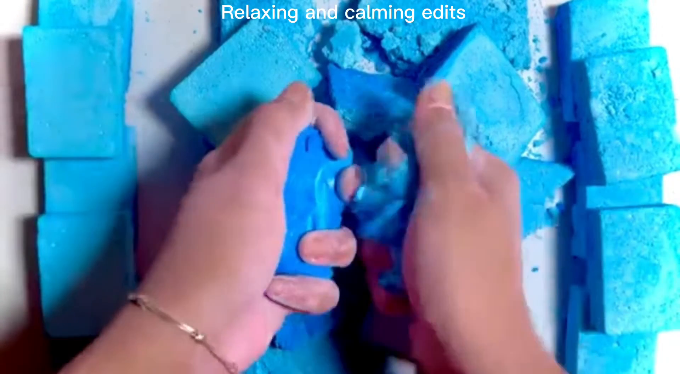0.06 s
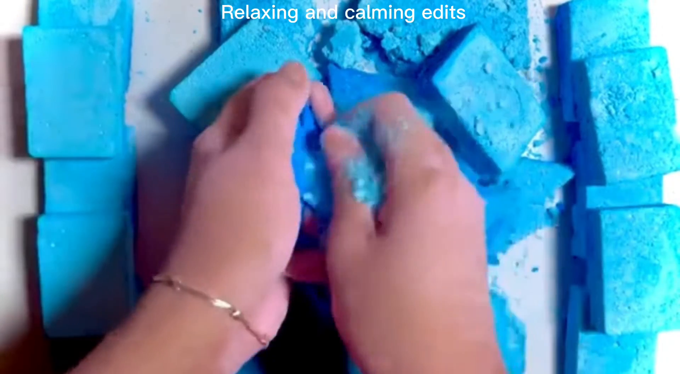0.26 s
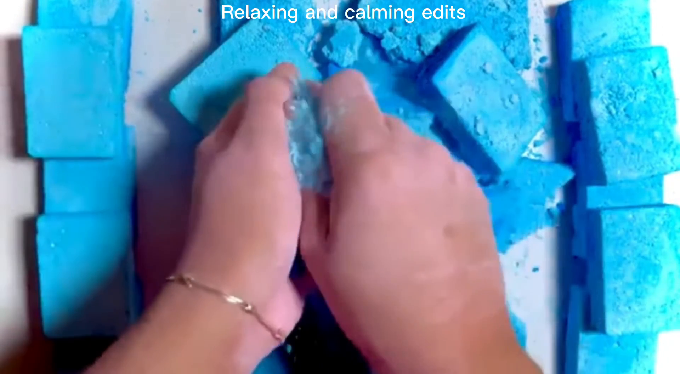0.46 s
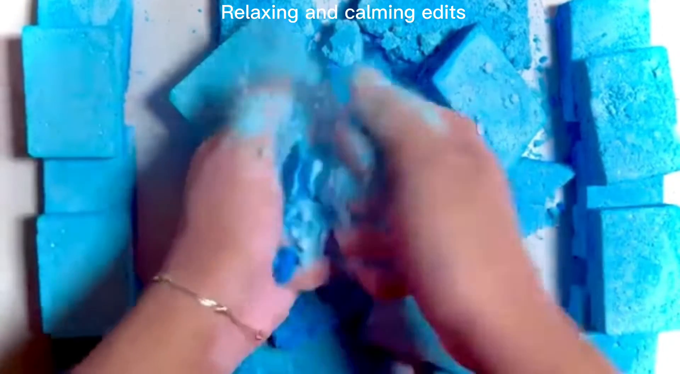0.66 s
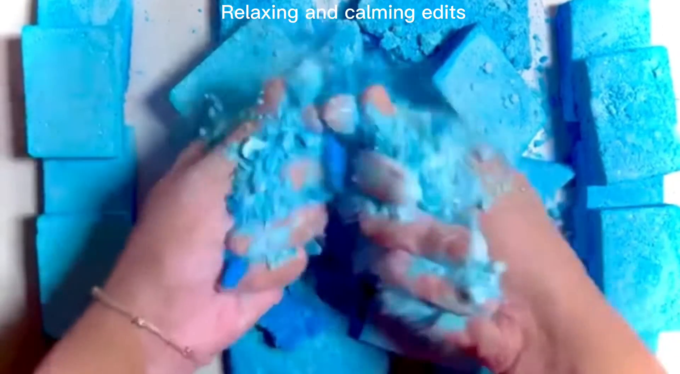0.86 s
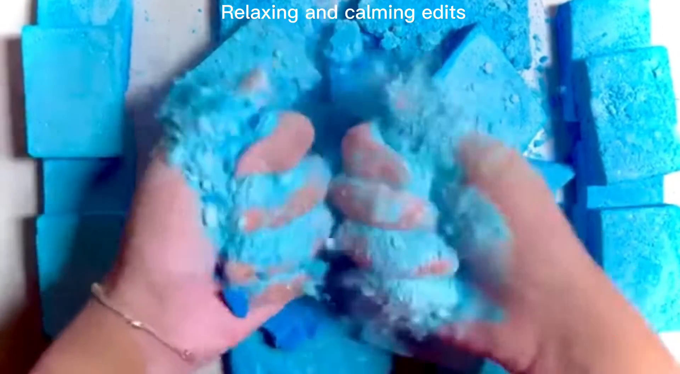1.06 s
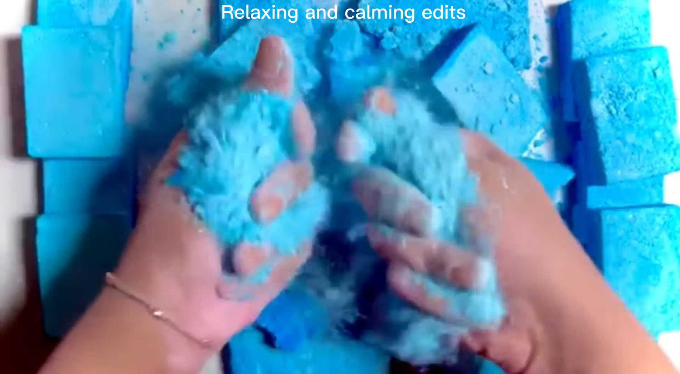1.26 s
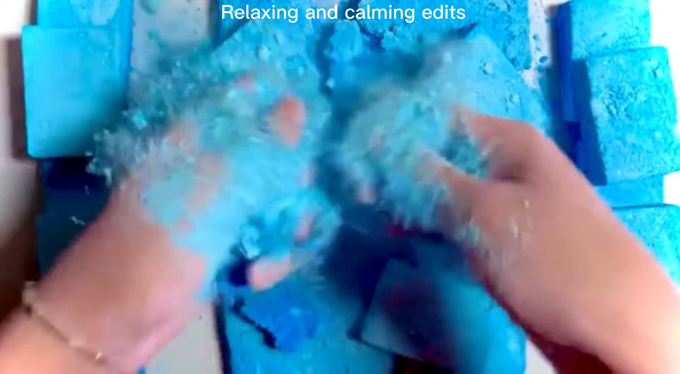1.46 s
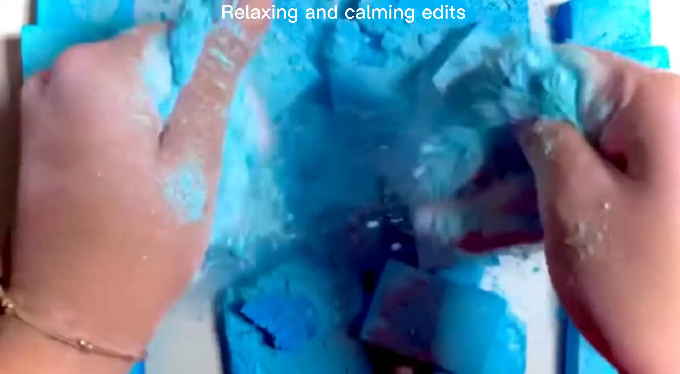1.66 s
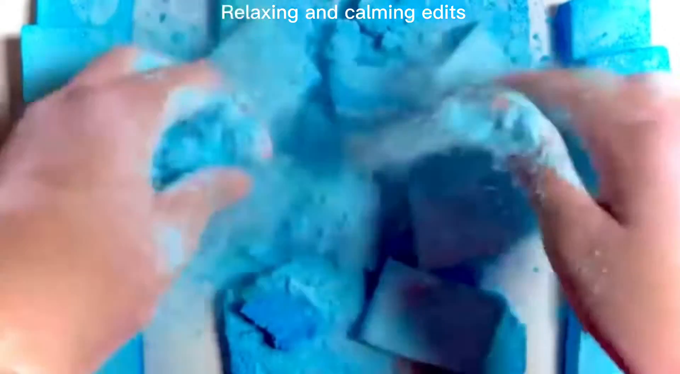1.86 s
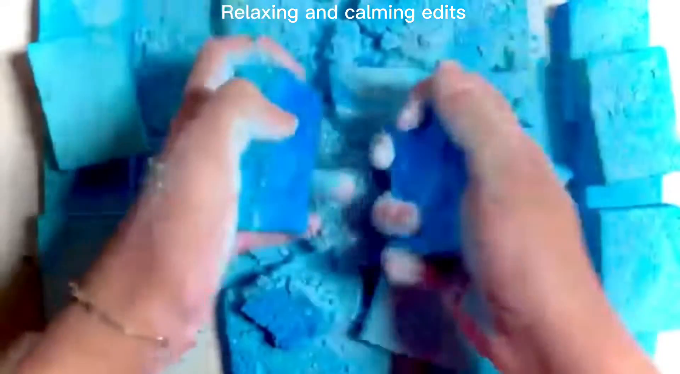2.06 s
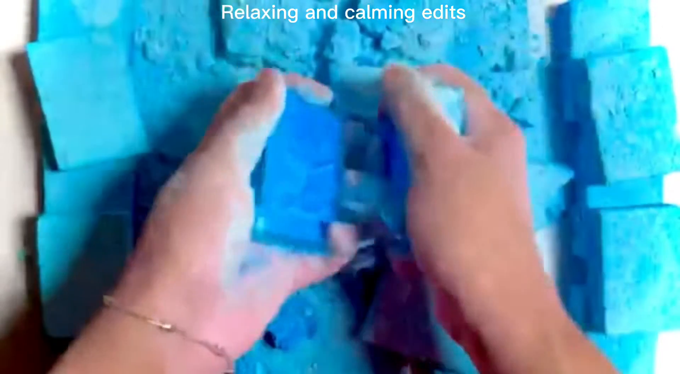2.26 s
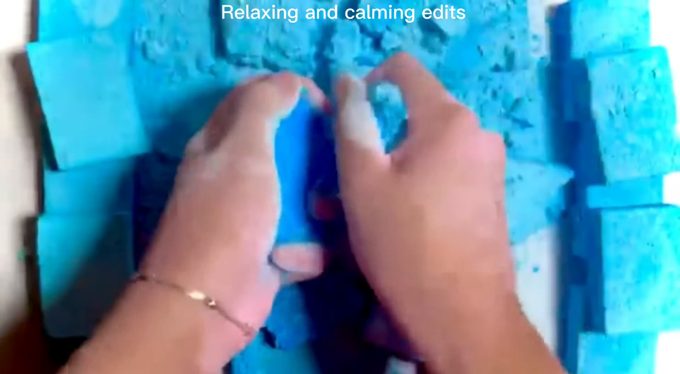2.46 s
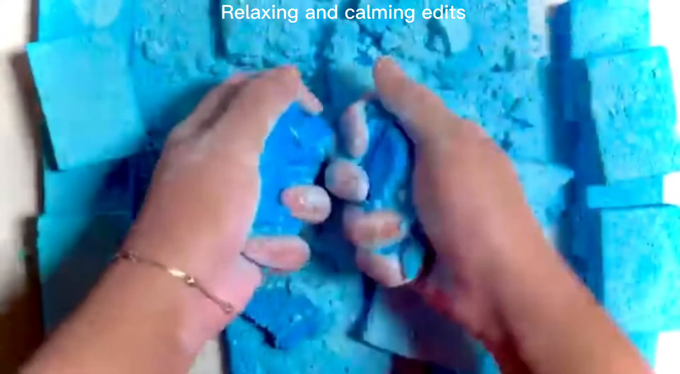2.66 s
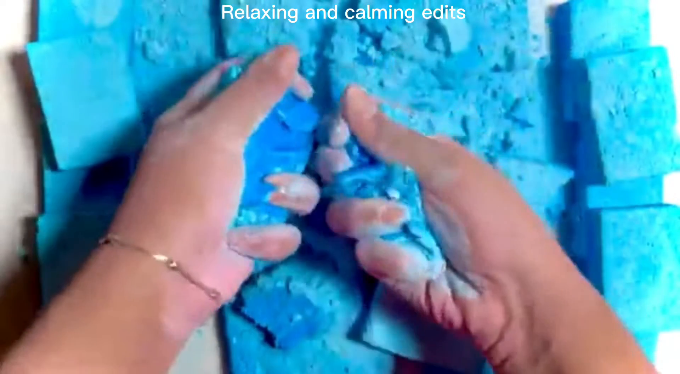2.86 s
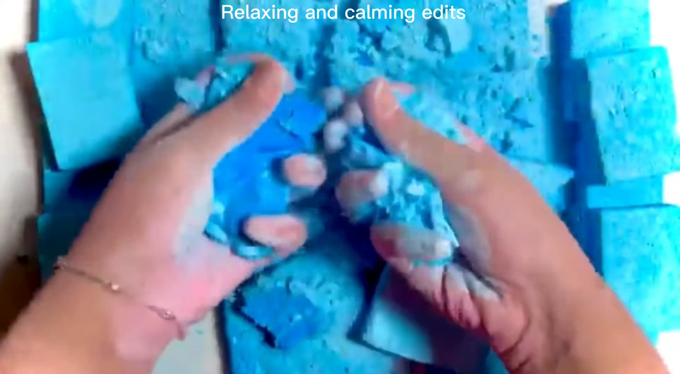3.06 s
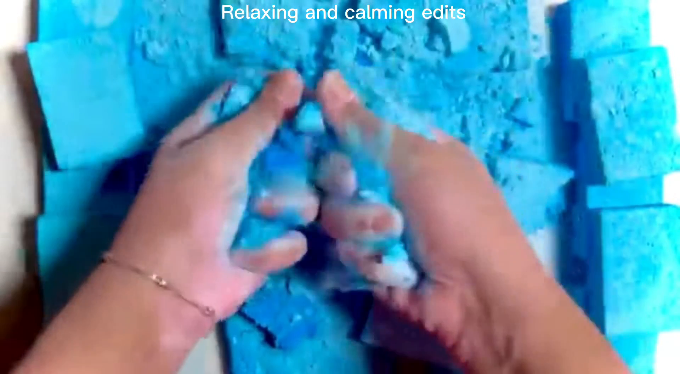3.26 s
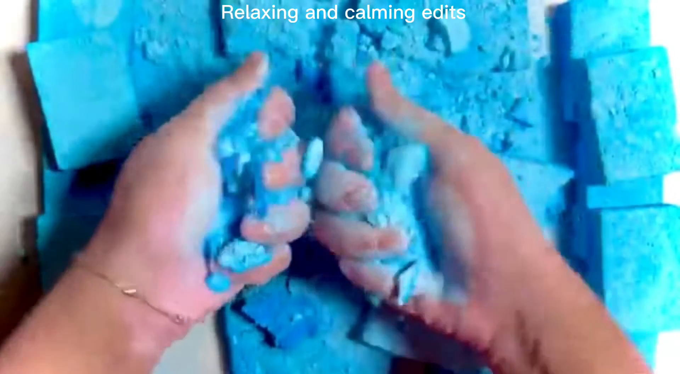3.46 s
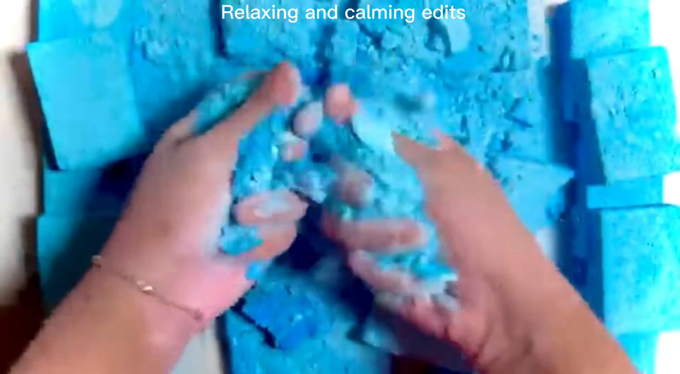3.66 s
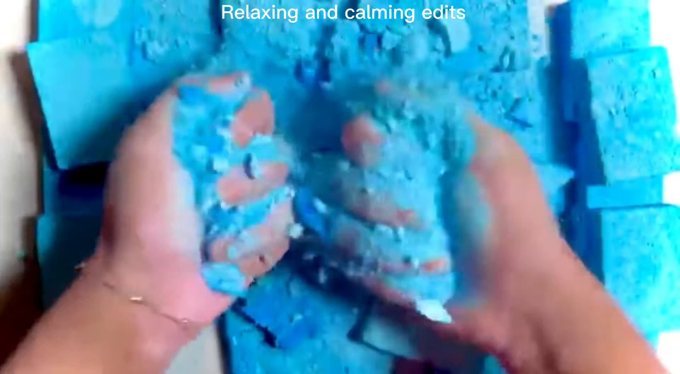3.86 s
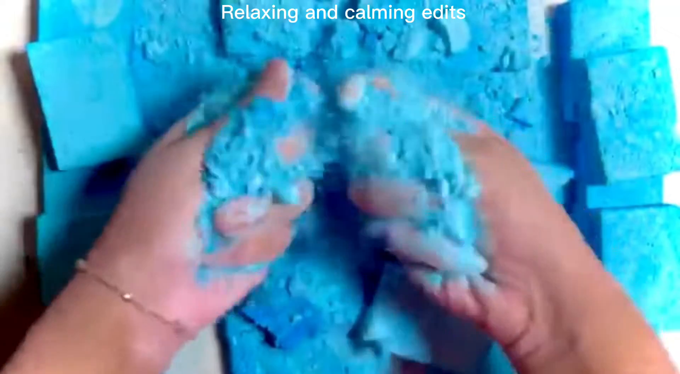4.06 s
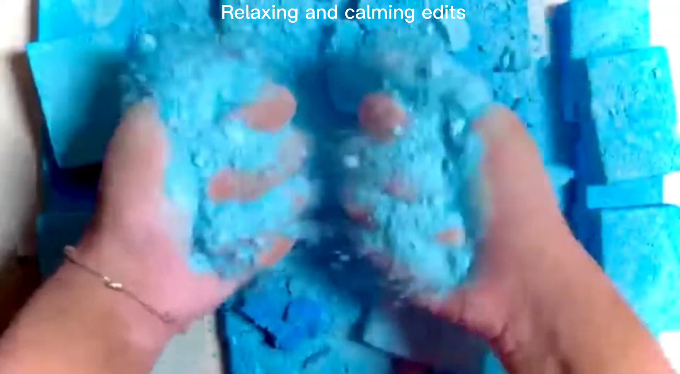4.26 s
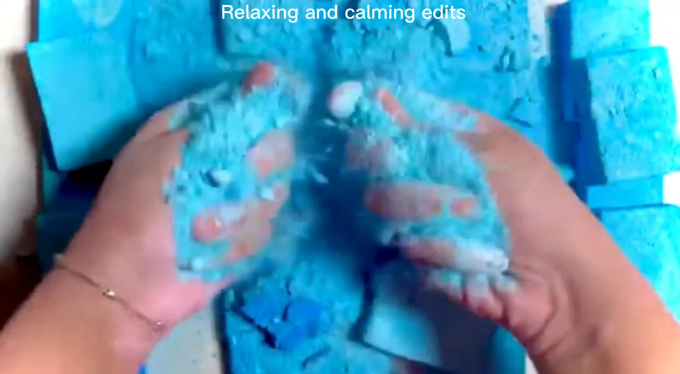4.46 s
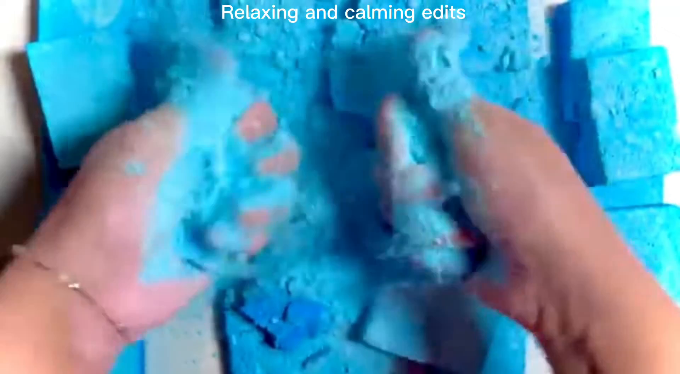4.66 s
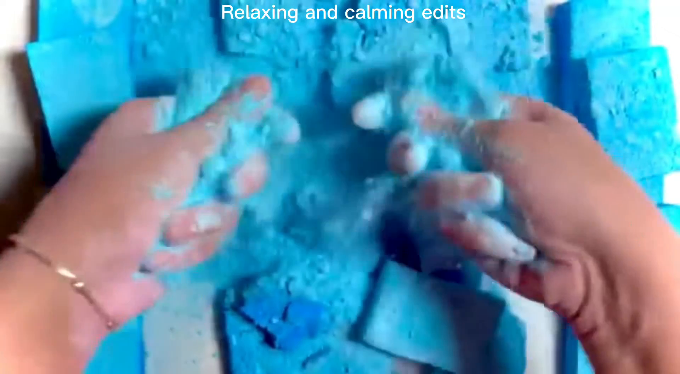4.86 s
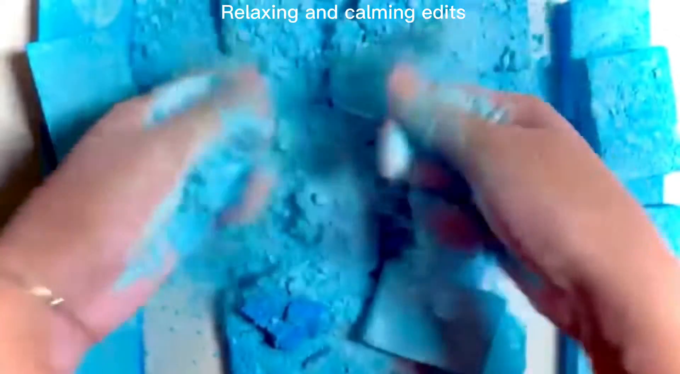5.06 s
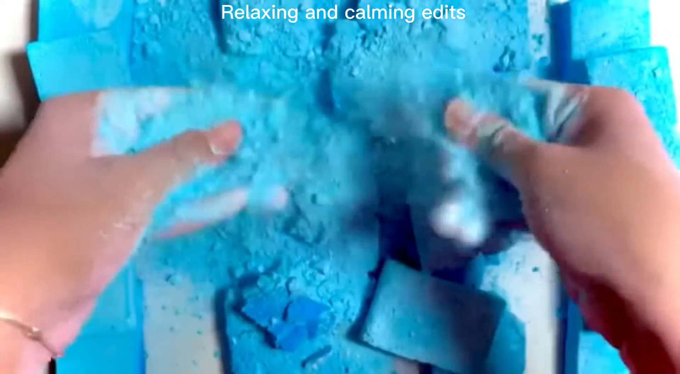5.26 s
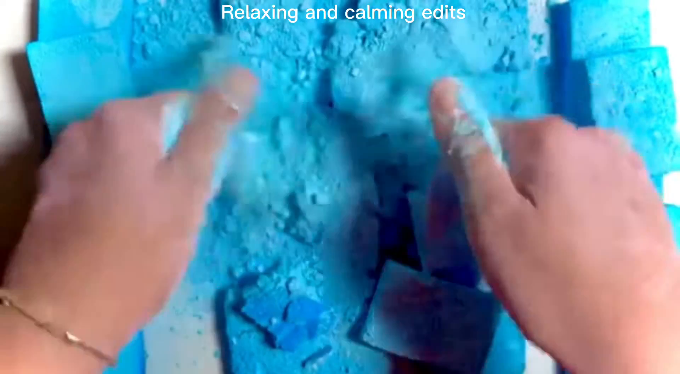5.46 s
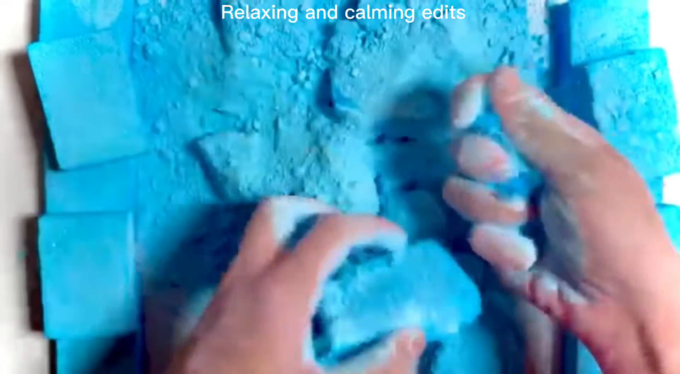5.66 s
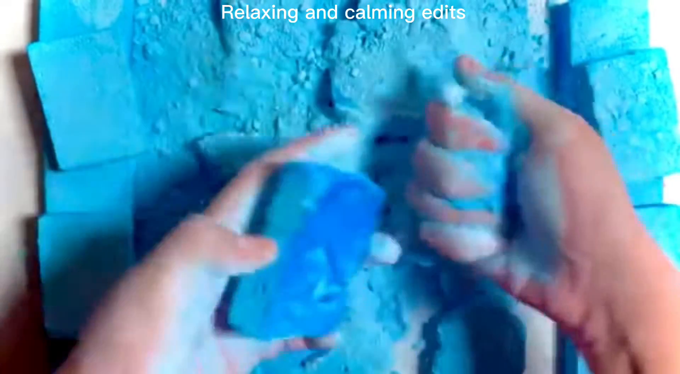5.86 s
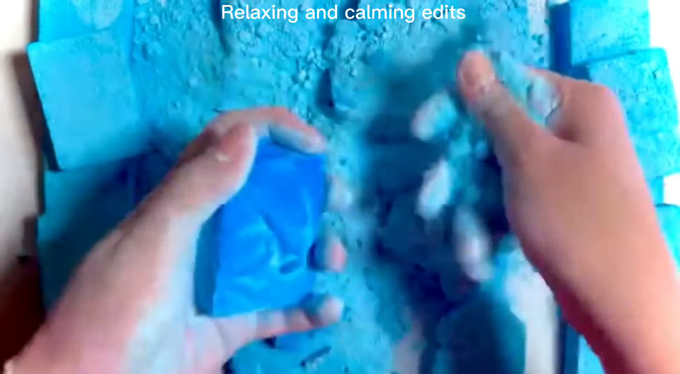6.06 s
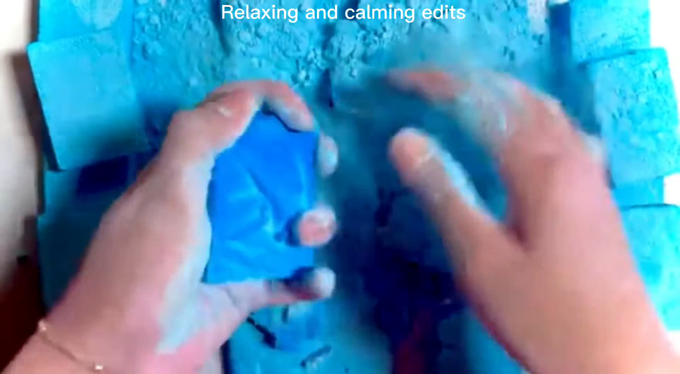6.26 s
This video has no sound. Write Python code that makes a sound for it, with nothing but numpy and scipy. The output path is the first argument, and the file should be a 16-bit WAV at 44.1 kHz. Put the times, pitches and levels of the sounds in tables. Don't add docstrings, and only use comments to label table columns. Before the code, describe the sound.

Close, crisp crunching of brittle chalk squeezed to powder by hand, with bright cracks, clicking chips and brief hissy trickles in a quiet room.

```python
import sys
import numpy as np
from scipy import signal
from scipy.fft import rfft, irfft, dct, next_fast_len
from scipy.io import wavfile

SR = 44100
rng = np.random.default_rng(int(sys.argv[2]) if len(sys.argv) > 2 else 0)


def int16_out(signal):
    q = np.round(np.clip(np.atleast_2d(signal).T, -1, 1) * 32767)
    wavfile.write(sys.argv[1], SR, q.astype(np.int16))


def ratio(d):
    e = np.asarray(d, float) / 20
    return 10 ** e


N = 279153


def at_hz(points, hz):
    table_hz, value = np.transpose(points)
    return np.interp(np.log(hz), np.log(table_hz), value)


def drift(hz):
    r = np.exp(-16 * np.pi * hz / SR)
    noise = rng.standard_normal(N // 8 + 3002)
    slow = signal.lfilter([1], [1, -2 * r, r * r], noise)[3000:]
    return np.interp(np.arange(N) / 8, np.arange(len(slow)), slow / slow.std())


def bandnoise(low_hz, high_hz, level_db):
    band = signal.butter(2, [low_hz, high_hz], "band", fs=SR, output="sos")
    noise = signal.sosfilt(band, rng.standard_normal(N))
    return ratio(level_db) * noise / noise.std()


def bursts(times, level_db, length_s, rise_s):
    power, t = np.zeros(N + 4096), np.arange(4096) / SR
    fall_s = np.clip(length_s, 0.003, 0.09)
    rise = 1 - np.exp(-t / rise_s)
    first_break = 0.63 + 1.12 * np.exp(-t / 0.00084)
    for s, db in zip(times, level_db):
        at = max(round(s * SR), 0)
        shape = ratio(db - 60 * (t / fall_s) ** 1.053) * rise * first_break
        power[at:at + 4096] += shape ** 2
    return power[:N]


def rings(table, rise_s, sag, level_db):
    out, t = np.zeros(N + 6000), np.arange(6000) / SR
    for s, db, hz, t60_s in table:
        turns = 2 * np.pi * hz * t * (1 - sag * t)
        swing = (np.sin(turns) + 0.25 * np.sin(2.0 * turns)) * (1 - np.exp(-t / rise_s))
        at = round(s * SR)
        out[at:at + 6000] += ratio(db + level_db - 60 * t / max(t60_s, 0.003)) * swing
    return out[:N]


GRIP_DB_PER_S, EASE_DB_PER_S, SAG_DB_PER_S = 324, 253, 4.5


def swells(start, hold, level_db):
    t = np.arange(0, N + 64, 64) / SR - np.array(start)[:, None]
    db = GRIP_DB_PER_S * np.minimum(t, 0) - SAG_DB_PER_S * np.maximum(t, 0)
    db -= EASE_DB_PER_S * np.maximum(t - hold[:, None], 0)
    power = np.sum(ratio(db + level_db[:, None]) ** 2, axis=0)
    return np.interp(np.arange(N) / 64, np.arange(t.shape[1]), power)


def room():
    return bandnoise(20, 90, level_db=-63.5) + bandnoise(95, 230, level_db=-54)


# (start [s], hold [s], level [dB], fineness [dB], lumps < 0 < powder)
SQUEEZES = [(0, 0.034, -47, 1), (.1, 0.11, -45.5, 0.5), (0.271, 0.17, -43.5, 0), (0.498, 0.11, -40, 1.5),
            (.66, 0.092, -43, 3), (.81, .11, -39.5, 1), (.96, 0.052, -42, 2.5), (1.061, 0.33, -41.5, 2),
            (1.28, 0.079, -43, 2.5), (1.4, 0.17, -39.5, 3), (1.62, 0.21, -43, 3), (1.861, 0.12, -45, 2.5),
            (2.04, 0.15, -47.5, 5.5), (2.44, .16, -43.5, -1), (2.701, 0.19, -43, 2), (2.99, 0.086, -42, 4),
            (3.14, 0.088, -37.5, 0.5), (3.28, .26, -39.5, 1), (3.6, 0.13, -38.5, -3.5),
            (3.735, 0.033, -44.5, -1), (3.781, .14, -40, 0), (3.991, 0.17, -40.5, -4),
            (4.151, .1, -40.5, 0.5), (4.3, 0.062, -42, 2), (4.42, 0.094, -42.5, -3), (4.56, 0.1, -42.5, 1),
            (4.763, .17, -43, -3), (5.05, 0.059, -45.5, 6), (5.174, .13, -41.5, 1.5),
            (5.35, 0.036, -46.5, -1.5), (5.6, 0.053, -41, 0), (5.685, 0.066, -40.5, 1.5),
            (5.76, 0.076, -47, 7), (6.0, .3, -62.5, 16)]
SQUEEZE_DB, FINE_SHARE = (-1, -0.6, -2.5, -4), (-0.69, -0.27, 0.44, 0.81)


def squeezes():
    start, hold, db, fine = np.transpose(SQUEEZES)
    return np.array([swells(start, hold, db + level + share * fine)
                     for level, share in zip(SQUEEZE_DB, FINE_SHARE)])


# (time [s], peak [dB], pitch [Hz], t60 [s])
THUDS = [(0.002, -25, 159, 0.047), (1.79, -29.5, 170, 0.062), (2.29, -32, 150, 0.059),
         (6.215, -29.5, 217, 0.038), (0.875, -17.5, 450, 0.027), (3.77, -24, 270, 0.04),
         (0.351, -15.5, 289, 0.066), (0.968, -13.5, 315, 0.036), (1.333, -19.5, 284.7, 0.039),
         (2.227, -26.5, 262, 0.061), (2.422, -18.5, 185, 0.042), (2.522, -19, 288, 0.07),
         (2.735, -14.5, 372, 0.031), (2.972, -11.5, 234, 0.038), (2.982, -19, 330, 0.04),
         (2.229, -21, 160, 0.044), (2.748, -18.5, 244, 0.034), (3.152, -8.5, 294, 0.027),
         (3.59, -25, 203, 0.048), (4.629, -12.5, 425, 0.021), (5.08, -14, 324, 0.023)]


def thuds():
    return rings(THUDS, rise_s=0.0078, sag=0.85, level_db=5.0)


# (time [s], peak [dB], pitch [Hz])
CHIPS = [(0.044, -39, 754), (0.106, -38, 778), (0.123, -38, 1340), (0.144, -25, 1740), (0.265, -39, 802),
         (0.31, -24, 1750), (0.412, -25, 767), (0.483, -25, 999), (0.544, -18, 1500), (0.604, -30, 1080),
         (0.634, -23, 1370), (0.679, -32, 794), (0.692, -17, 2140), (0.785, -28, 880), (0.809, -32, 1410),
         (0.828, -32, 899), (0.928, -27, 1610), (1.053, -33, 1660), (1.07, -28, 1680), (1.807, -32, 736),
         (1.877, -33, 1840), (1.933, -22.5, 1600), (1.975, -25, 837), (1.992, -22, 1550),
         (2.038, -31, 1040), (2.319, -34, 4160), (2.384, -19, 1810), (2.39, -15, 1950), (2.423, -23, 610),
         (2.442, -25, 1610), (2.547, -13, 970), (2.568, -20, 1320), (2.654, -25.5, 956), (2.684, -28, 970),
         (2.769, -19, 1640), (2.809, -21, 1240), (2.83, -25, 1660), (2.908, -23, 1300), (3.016, -23, 1060),
         (3.053, -19, 1420), (3.083, -28, 2100), (3.431, -20, 1700), (3.455, -20, 859), (3.504, -34, 821),
         (3.591, -23, 1490), (3.636, -23, 872), (3.667, -20, 1000), (3.822, -18, 1550), (3.985, -36, 869),
         (4.174, -14, 1210), (4.257, -30, 754), (4.479, -18, 988), (4.503, -26, 775), (4.567, -31, 837),
         (4.605, -26, 1730), (4.633, -21, 1610), (4.872, -21, 1060), (4.905, -20.5, 937),
         (5.065, -31, 1400), (5.314, -23, 1520)]
# (time [s], peak [dB], pitch [Hz])
LATE_CHIPS = [(5.234, -25, 1730), (5.264, -17, 923), (5.378, -24, 1490), (5.523, -25.5, 945),
              (5.625, -26, 800), (5.644, -26, 1310), (5.691, -18.5, 762), (5.739, -21, 797),
              (5.759, -30, 875), (5.909, -36, 4760), (5.989, -35, 4780), (6.149, -39, 3320),
              (6.219, -39, 740)]
# (time [s], peak [dB], pitch [Hz])
WARNINGS = [
    (.514, -22.5, 940),
    (0.5, -18, 1590),
    (.576, -19, 1500),
    (2.3, -21, 1330),
    (4.136, -19, 1180),
    (2.367, -17, 910),
    (2.399, -20, 1600),
    (2.405, -20, 2000),
    (1.338, -22, 1900),
    (1.7, -26, 1500),
]


def chip_clicks():
    at, peak_db, _ = np.transpose(CHIPS + LATE_CHIPS + WARNINGS)
    power = np.zeros((4, N))
    for k, level_db in ((1, -9.0), (2, -15.5), (3, -18.0)):
        power[k] = bursts(at, peak_db + level_db, 0.008, 0.0004)
    return power


def chip_pings():
    pings = [(s, db, hz, 12 / hz) for s, db, hz in CHIPS + LATE_CHIPS + WARNINGS]
    return rings(pings, rise_s=0.0004, sag=6.4, level_db=-2.5)


def breaks(table, length_s):
    at, peak_db, heft_db, edge_db = np.transpose(table)
    return np.array([bursts(at, peak_db + heft_db + 3.0, 1.54 * length_s, 0.0014),
                     bursts(at, peak_db - 7.5, length_s, 0.00033),
                     bursts(at, peak_db + edge_db + 0.65, 1.6 * length_s, 0.0013),
                     bursts(at, peak_db + edge_db - 4.5, 1.2 * length_s, 0.0014)])


# (time [s], peak [dB], heft [dB], edge [dB])
SNAPS = [(0.076, -18, -8.5, -30), (0.332, -14.5, -8.5, -13), (0.3515, 2, -32, -17), (0.356, -6.5, -5.5, -4),
         (0.5205, -3, -12, -18), (0.532, -14, -26, -28), (0.572, -11.5, -13, -13), (0.586, -17.5, -8, -10),
         (0.885, -22.5, -6, -2.5), (1.294, -13.5, -24, -24), (1.4, -11, -17, -17), (1.439, -21.5, -4, 2),
         (1.459, -12.5, -25, -20), (1.528, -23, -10, 2), (1.549, -25, -2, -20), (1.596, -20, -30, -5),
         (1.759, -15.5, -28, -27), (4.237, -28, -15, 6), (3.693, -14, -23, -12), (3.831, -15.5, -10, -16),
         (3.873, -16, -25.5, -9), (4.465, -20.5, -13, -18), (4.805, -17.5, -10, -11.5),
         (4.861, -15, -19, -33), (5.211, -13.5, -35, -11), (5.291, -16, -31, -20),
         (3.355, -16.5, -24, -9.5), (3.795, -16.5, -14, -18), (3.856, -18, -4, -20),
         (6.195, -27.5, -20, -2)]


def snaps():
    return breaks(SNAPS, length_s=0.017)


# (time [s], peak [dB], hiss over grit [dB])
TICKS = [(0.278, -20, 11), (0.353, 6.5, -0.5), (0.52, -6.5, -25), (0.586, -18, -17), (0.969, -23, 19),
         (1.438, -19, -19), (1.599, -18.5, -1.5), (2.007, -15.5, -0.5), (2.135, -22.5, 17), (2.228, -6, 0),
         (2.24, -11.5, 21), (2.3621, 0.5, 5.5), (2.401, -5, 4), (2.5264, -6, -4), (2.556, -11, 0),
         (2.588, -14.5, 0), (2.738, -10, 1), (2.776, -14.5, 2), (2.917, -10, 5), (3.1077, -17.5, 15),
         (3.1467, -19, 2), (3.202, -7.5, -1), (3.236, -6, 6), (4.0243, -19.5, 15), (4.706, -19, 5),
         (5.51, -20.5, 8), (5.5897, -20, 14), (5.633, -13, 1), (6.093, -19.5, 0), (6.3246, -18.5, 4)]


def ticks():
    at, peak_db, tilt_db = np.transpose(TICKS)
    return np.array([np.zeros(N),
                     bursts(at, peak_db - 15.5, 0.018, 0.00058),
                     bursts(at, peak_db - 11.5 - tilt_db / 2, 0.018, 0.00028),
                     bursts(at, peak_db - 8.5 + tilt_db / 2, 0.018, 0.0013)])


# (time [s], peak [dB], pitch [Hz], t60 [s])
PARTINGS = [(0.351, 11.5, 1990, 0.0082), (0.521, 0, 970, 0.026), (1.2, -16, 1900, 0.013),
            (1.2, -21, 832, 0.014), (2.782, -16, 1130, 0.012), (2.588, -15, 1280, 0.013),
            (0.52, -2.5, 1480, 0.018), (0.52, -7, 1600, 0.018), (0.521, -6, 4900, 0.014),
            (0.357, -3, 807, 0.021), (0.355, -1, 4760, 0.015), (2.361, -7, 5010, 0.02),
            (2.376, -14, 1700, 0.014), (2.527, -10, 1560, 0.012), (3.201, -7, 1680, 0.014),
            (4.153, -9, 991, 0.012), (3.8, -16, 2100, 0.008), (1.401, -11.5, 1920, 0.018),
            (1.402, -18, 1200, 0.012), (2.227, -8, 2040, 0.014), (2.228, -10, 1500, 0.012),
            (2.36, -7, 1600, 0.0087), (2.745, -6, 800, 0.016), (3.151, -0.5, 2220, 0.012)]


def partings():
    return rings(PARTINGS, rise_s=0.002, sag=5.5, level_db=-1.0)


# (time [s], peak [dB], heft [dB], edge [dB])
CRUMBLES = [
    (2.378, -16.5, -20, -4.5),
    (0.389, -18, -18, -13.5),
    (1.1, -31, -6, 3.5),
    (1.322, -30, -37, 2),
    (1.673, -17.5, -17, -25),
    (2.502, -21.5, -13, -12),
    (3.15, -11.5, -18, -3.5),
    (3.173, -18, -22, -10),
    (4.16, -16, -20, -14),
]


def crumbles():
    return breaks(CRUMBLES, length_s=0.094)


# (start [s], hold [s], level [dB])
SIFTS = [(1.7, 0.12, -46.5), (2.235, 0.055, -42.5), (1.976, 0.033, -66), (2.377, 0.041, -37),
         (2.4, 0.021, -32), (2.932, 0.021, -37.5), (4.934, 0.066, -41.5), (5.444, 0.12, -47.5),
         (5.6, .03, -55), (5.125, 0.016, -44.5), (5.37, 0.024, -53.5), (5.857, 0.084, -48),
         (5.977, 0.014, -39), (6.061, 0.045, -46), (6.188, 0.015, -46.5), (6.305, 0.041, -52)]
SIFT_DB = (-25, -8.5, -3, -0.4)


def sifts():
    start, hold, db = np.transpose(SIFTS)
    return np.array([swells(start, hold, db + level) for level in SIFT_DB])


# (time [s], peak [dB], heft [dB], edge [dB])
MORE_SNAPS = [(2.109, -15, -21, -27), (2.135, -12.5, -10, -19), (2.178, -20, -15, -23),
              (2.227, -8.5, -17.5, -16), (2.356, -5.5, -21, -5), (2.359, -6.5, -21.5, -6),
              (2.374, -10.5, -21, -1.5), (2.39, -19, -19, 3.5), (2.414, -16.5, -11, -0.5), (2.434, -28, -1, 2),
              (2.524, -18.5, 1.5, -20), (2.556, -12.5, -37, -12), (2.59, -19, -19, -18), (2.696, -24, -23, -23),
              (2.744, -7.5, -7, -25), (2.782, -12.5, -27, -12), (2.829, -22, -7, -6), (3.053, -25, -27, 2.5),
              (3.197, -19.5, -18, 1.5), (3.206, -17, -24, 0), (3.228, -29, -5, 3), (3.268, -17, -17, -27),
              (3.318, -19.5, -27, -8), (3.373, -14.5, -35, -30), (3.411, -19.5, -20, -5)]


def more_snaps():
    return breaks(MORE_SNAPS, length_s=0.019)


def fracture_force():
    rest_db = np.array([[-56], [-59.5], [-59.5], [-56]])
    bed = squeezes() + sifts() + ratio(rest_db) ** 2
    lump_db = 3.0 * drift(54) + 2.4 * drift(68)
    powder_db = 1.1 * drift(14) + 1.3 * drift(94)
    pop_db = 2.63 * np.minimum(rng.exponential(1, N), 1.6)
    pops = (rng.random(N) < 230 / SR) * ratio(pop_db) ** 2
    crackle = signal.lfilter([1], [1, -ratio(-120 / (0.011 * SR))], pops)
    power = np.zeros((4, N))
    for k, (powder_share, depth) in enumerate(zip([0.3, 0.6, 0.85, 0.95], [0.23, 0.37, 0.6, 0.17])):
        clump_db = (1 - powder_share) * lump_db + powder_share * powder_db
        power[k] = (1 + depth * crackle) * bed[k] * ratio(clump_db) ** 2
    power += snaps() + more_snaps() + crumbles() + ticks() + chip_clicks()
    return np.sqrt(power)


REGISTER_HZ = [700, 2450, 6000]


def shards(force, per_s, cycles, level_db):
    born = (rng.random(N) < per_s / SR) * rng.standard_normal(N) * np.sqrt(SR / per_s)
    pitches, dealt, out = np.geomspace(750, 9000, 22), rng.integers(0, 22, N), np.zeros(N)
    for k, hz in enumerate(pitches):
        r, w = ratio(-60 * hz / (cycles * SR)), 2 * np.pi * hz / SR
        strikes = born * (dealt == k) * force[np.searchsorted(REGISTER_HZ, hz)] + 1e-18
        gain = np.sin(w) * np.sqrt(1 - r * r)
        out += signal.lfilter([0, gain], [1, -2 * r * np.cos(w), r * r], strikes)
    return ratio(level_db) * out


# (frequency [Hz], density [dB per Hz])
COLOUR = [(50, -80), (100, -2.5), (200, 1.5), (420, 3), (600, -4.5), (820, 2.5), (1800, 1), (2200, 0),
          (2900, -2.5), (5000, -2), (7000, -1.), (10000, -4), (13000, -6), (15500, -12.5)]


def chalk(grain_db, patchy_db):
    force = fracture_force()
    sizes = ratio(grain_db * np.minimum(rng.exponential(1, N), 4.4))
    cracks = rng.standard_normal((2, 2, N)) * sizes / np.sqrt(np.mean(sizes ** 2))
    edges = 700 * 3.5 ** np.arange(-2.25, 2.6, 0.25)
    centres = np.sqrt(edges[1:] * edges[:-1])
    power = ratio(at_hz(COLOUR, centres)) ** 2 * np.diff(edges)
    register_power = np.bincount(np.searchsorted(REGISTER_HZ, centres), power)
    density = force ** 2 / register_power[:, None]
    place = at_hz([(480, 0), (900, 1), (1400, 1), (3400, 2), (4600, 2), (7500, 2.999)], centres)
    out = np.zeros((2, N))
    for k, (low, high) in enumerate(zip(edges, edges[1:])):
        below, share = int(place[k]), place[k] % 1
        drive = np.sqrt((1 - share) * density[below] + share * density[below + 1])
        gain = np.sqrt(power[k] * SR / 2 / (high - low)) * ratio(patchy_db * drift(20.6))
        band = signal.butter(2, [low, high], "band", fs=SR, output="sos")
        out += signal.sosfilt(band, cracks[k % 2] * drive * gain)
    return out + shards(force, per_s=320, cycles=114.0, level_db=-7.0) * [[1], [0.5]]


# (frequency [Hz], phase [rad])
PORT_PHASE = [(0, 0), (520, -.6), (800, .1), (1800, .05), (2760, 2.2), (3900, 1.7), (5080, 1.2),
              (5950, 3.14), (8150, 6.28), (10300, 9.42), (12500, 12.57), (14800, 15.7), (22050, 25)]
# (frequency [Hz], level [dB])
DIFFUSE = [(40, -6), (80, -29), (250, -13), (600, -5.5), (1500, -12), (3500, -6), (8000, -14.5),
           (15000, -8)]
# (frequency [Hz], level [dB])
LEAN = [(60, 0), (180, -2), (550, -4), (1650, -0.5), (4970, -3), (15000, 2)]


def ports(direct, other, likeness):
    size = next_fast_len(N + 2048)
    hz = np.arange(size // 2 + 1) * SR / size + 1
    half = np.interp(hz, *np.transpose(PORT_PHASE)) / 2
    a, b = rfft(direct, size), rfft(other, size)
    scattered = ratio(at_hz(DIFFUSE, hz)) * b
    mid = np.cos(half) * a + np.abs(np.sin(half)) * scattered
    side = 1j * np.sin(half) * (likeness * a + np.sqrt(1 - likeness ** 2) * b)
    side += np.abs(np.cos(half)) * scattered
    lean = ratio(at_hz(LEAN, hz) / 2)
    return irfft(np.array([(mid + side) * lean, (mid - side) / lean]), size)[:, :N]


def scene():
    direct, other = chalk(grain_db=3.0, patchy_db=2.0)
    rumble = room()
    low = thuds() + partings() + chip_pings()
    return ports(direct + low + rumble, other + 0.1 * low + rumble[::-1], likeness=0.62)


BAND_LINES = [64, 72, 80, 88, 96, 108, 120, 132, 144, 160, 176, 196, 216, 240, 264, 292, 320, 352, 384, 416,
              448, 480, 512, 544, 576, 608, 640, 672, 704, 736, 768, 1025]
# (frequency [Hz], level [dB])
SUM_MASKED = [(4000, -14), (5700, -7), (6300, -10), (9600, -6), (13000, -6), (13700, 4), (14900, 4),
              (15100, -6)]
# (frequency [Hz], level [dB])
DIFFERENCE_MASKED = [(1300, -19), (1550, -11), (1900, -14), (2500, -14), (7600, -6), (8300, -8),
                     (11000, -5), (13100, -3)]


def drop_masked(x, sudden_db, faint_db, dead):
    lead = 2048 - 474
    padded = np.pad([x[0] + x[1], x[0] - x[1]], ((0, 0), (lead, 3072 - (lead + N) % 1024)))
    window = np.sin(np.pi * (np.arange(2048) + 0.5) / 2048)
    halves = padded.reshape(2, -1, 1024)
    frames = np.concatenate([halves[:, :-1], halves[:, 1:]], axis=2) * window
    a, b, c, d = np.split(frames, 4, axis=2)
    folded = np.concatenate([-c[..., ::-1] - d, a - b[..., ::-1]], axis=2)
    lines = dct(folded, type=4, norm="ortho")
    steps = np.diff(padded[0, 512:-512], prepend=0).reshape(-1, 8, 128)
    energy = np.sum(steps ** 2, axis=2) + 1e-12
    steady = energy.max(axis=1) / np.median(energy, axis=1) < ratio(sudden_db) ** 2
    for low, high in zip(BAND_LINES, BAND_LINES[1:]):
        band, hz = lines[..., low:high], low * SR / 2048
        level = np.sqrt(np.mean(band ** 2, axis=2))
        faint = ratio(faint_db) * (low > 660)
        masked = level[::-1] * ratio([[at_hz(SUM_MASKED, hz)], [at_hz(DIFFERENCE_MASKED, hz)]])
        small = np.abs(band) < dead * min(low / 120, 1) * level[..., None]
        weak = (level < np.maximum(masked, faint))[..., None]
        lines[..., low:high] *= ~(steady[:, None] & (small | weak))
    u, v = np.split(dct(lines, type=4, norm="ortho"), 2, axis=2)
    blocks = np.concatenate([v, -v[..., ::-1], -u[..., ::-1], -u], axis=2) * window
    joined = (blocks[:, 1:, :1024] + blocks[:, :-1, 1024:]).reshape(2, -1)
    mid, side = joined[:, lead - 1024:lead - 1024 + N]
    return np.array([mid + side, mid - side]) / 2


# (start [s], end [s], depth [dB])
GAPS = [
    (2.0135, 2.0335, -60),
    (5.113, 5.135, -9),
    (5.5595, 5.5705, -27),
    (5.57, 5.587, -9),
]


def edit_gaps(x):
    t = np.arange(N) / SR
    gains = [np.clip(np.maximum(start - t, t - end) / 0.0012, ratio(db), 1) for start, end, db in GAPS]
    return x * np.min(gains, axis=0)


def band_limit(x):
    return signal.sosfilt(signal.butter(12, 16420, fs=SR, output="sos"), x)


def record(dry):
    low_pass = signal.cheby2(8, 60, 16700, fs=SR, output="sos")
    cut = signal.sosfilt(low_pass, dry)
    thinned = drop_masked(np.clip(cut, -1, 1), sudden_db=8, faint_db=-55, dead=0.19)
    mix = edit_gaps(thinned)
    return band_limit(mix)


dry = scene()
out = record(dry)
int16_out(out)
```